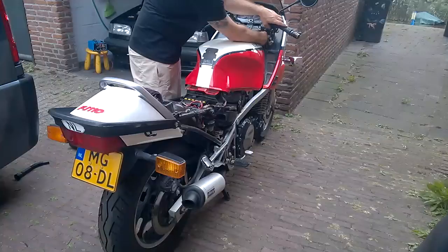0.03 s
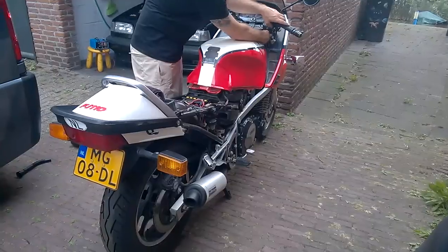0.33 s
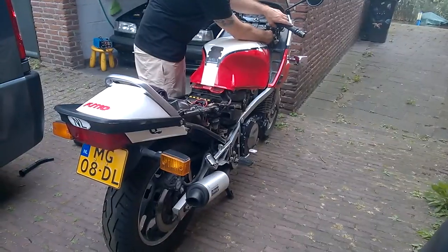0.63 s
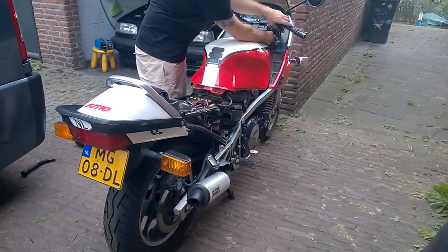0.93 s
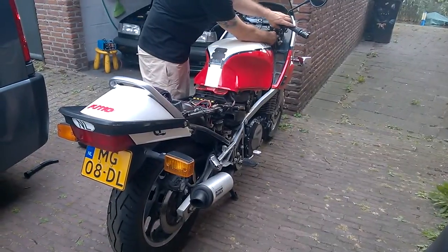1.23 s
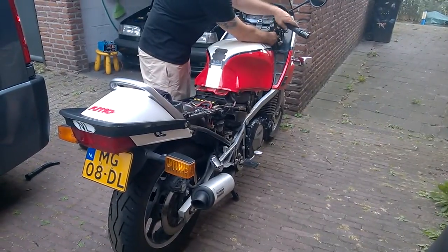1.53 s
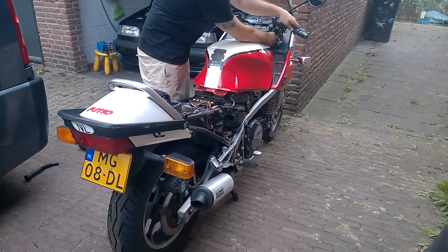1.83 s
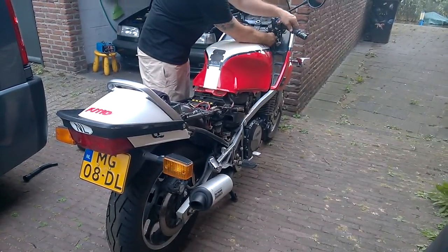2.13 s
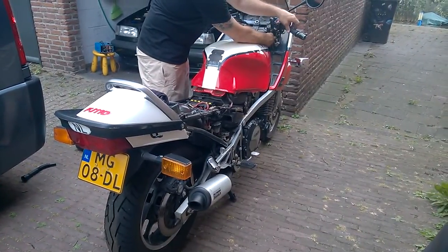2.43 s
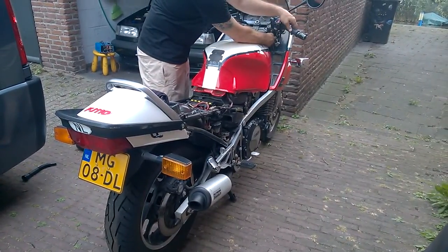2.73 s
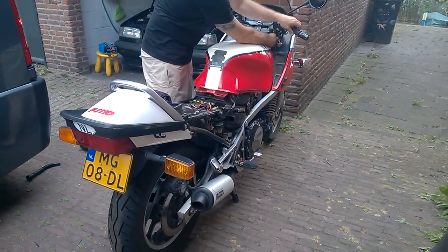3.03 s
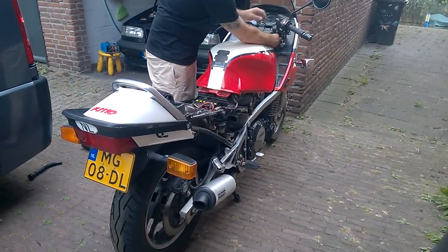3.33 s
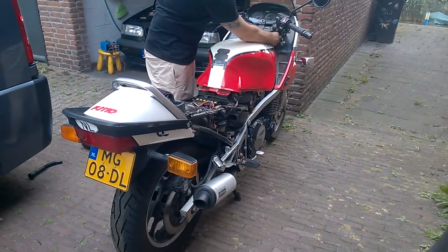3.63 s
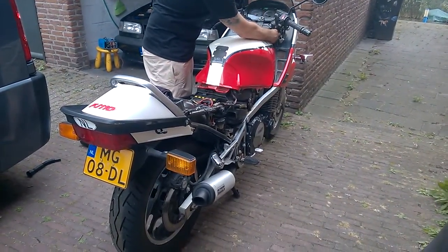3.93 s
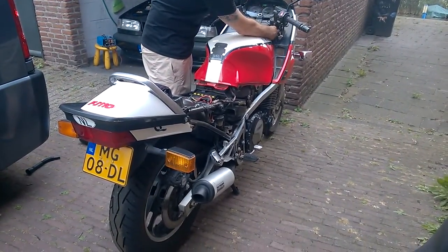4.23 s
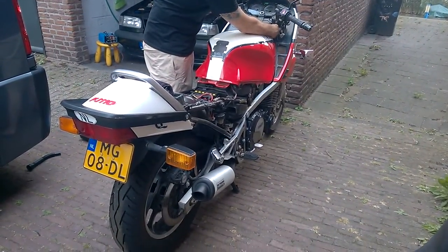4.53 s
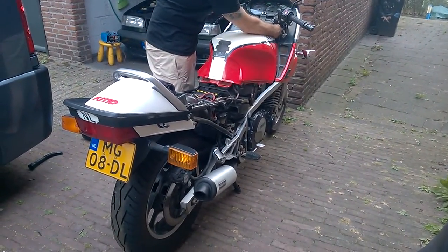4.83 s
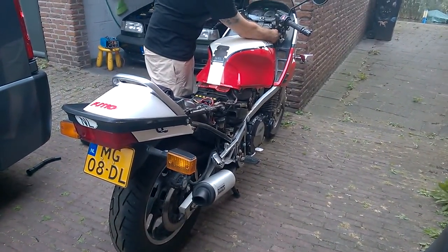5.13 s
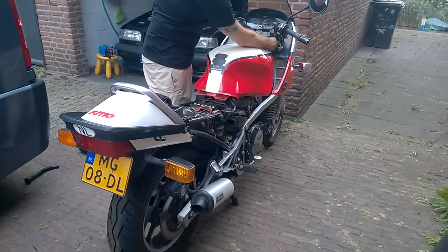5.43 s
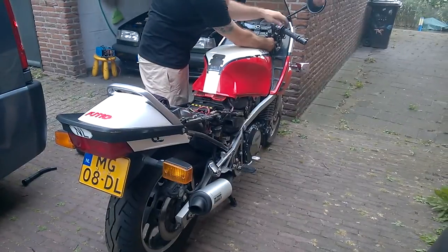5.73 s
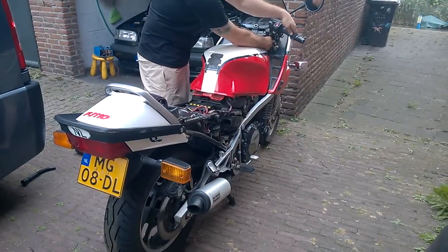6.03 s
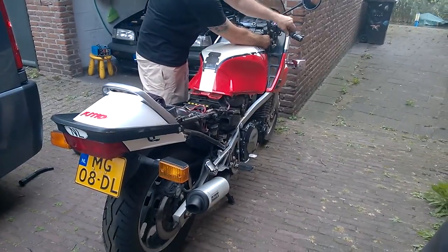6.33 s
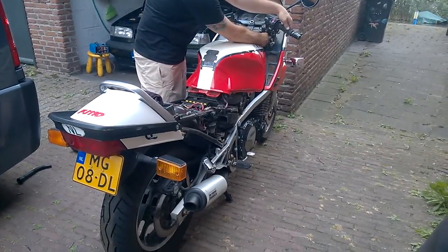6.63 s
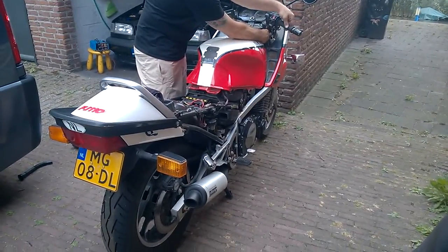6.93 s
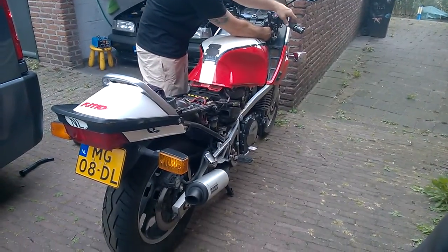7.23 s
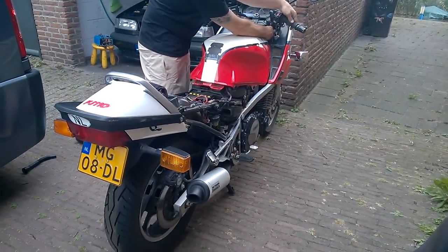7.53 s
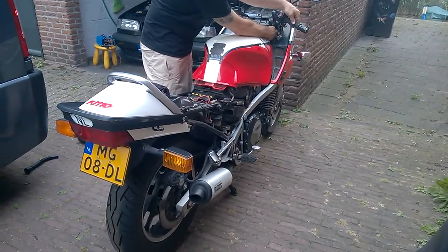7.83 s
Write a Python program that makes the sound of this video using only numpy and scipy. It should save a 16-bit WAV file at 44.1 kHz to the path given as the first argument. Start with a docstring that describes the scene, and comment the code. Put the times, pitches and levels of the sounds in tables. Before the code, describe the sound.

A motorcycle's starter snaps on and whirs briefly, the exhaust coughs and the engine catches. It climbs to a lumpy, booming idle with raspy exhaust, a mechanical rattle, a thin whine and light ticking. One quick rev comes early, then a dry click, then three more revs near the end, with sharp cracks from the pipe. The sound is close, from behind the silencer, outdoors on a quiet driveway.

```python
"""A four-cylinder motorcycle starts up, heard from close behind its silencer.
In faint street air a hand scuffs the handlebar; a relay snaps, the starter whirs and cold gas coughs.
The engine catches and climbs to a lumpy idle with one weak cylinder: firings boom and rasp through the
pipe, the valve gear rattles, a gear whines and a loose tappet ticks. Four throttle blips follow, with
barks in the pipe and one dry click between the first two. A fast limiter holds the peaks throughout."""
import sys
import numpy as np
from scipy import signal
from scipy.fft import rfft, irfft, next_fast_len
from scipy.io import wavfile
from scipy.ndimage import uniform_filter1d, minimum_filter1d, map_coordinates

SR = 44100
rng = np.random.default_rng(int(sys.argv[2]) if len(sys.argv) > 2 else 0)


def generate_wav(sig):
    """Save sig (samples, or channels by samples) to the path in sys.argv[1] as 16-bit PCM at SR."""
    pcm = np.round(np.clip(np.atleast_2d(sig).T, -1, 1) * 32767).astype(np.int16)
    wavfile.write(sys.argv[1], SR, pcm)


N = 351918
TIME = np.arange(N) / SR
CATCH_S, CLICK_S = .823, 5.4233  # steady firing begins; the dry click


def amp(db):
    """Decibels to gain."""
    return 10 ** (np.asarray(db) / 20)


def unit(x):
    """x at rms 1."""
    return x / np.sqrt(np.mean(x ** 2) + 1e-20)


def curves(rows):
    """One automation curve for each column after the time."""
    time_s, *columns = np.transpose(rows)
    return [np.interp(TIME, time_s, column) for column in columns]


def wobble(rate):
    """A smooth random curve, rate knots a second."""
    return map_coordinates(rng.standard_normal(int(N * rate / SR) + 4), [TIME * rate])


def coloured(x, points, peaks=()):
    """Causal EQ: a curve of (freq_hz, gain_db) with resonances (centre_hz, width_hz, lift_db) on top."""
    size = 2 * next_fast_len(N // 2 + SR // 4)
    hz = np.fft.rfftfreq(size, 1 / SR)
    freq_hz, gain_db = np.transpose(points)
    db = np.interp(np.log(hz + 1), np.log(freq_hz), gain_db)
    for centre, width, lift in peaks:
        db = db + lift / (1 + (2 * (hz - centre) / width) ** 2)
    cepstrum = irfft(np.log(amp(db)))
    cepstrum[1:size // 2] *= 2  # minimum phase: the ring follows the hit
    cepstrum[size // 2 + 1:] = 0
    return irfft(rfft(x, size) * np.exp(rfft(cepstrum)))[:N]


def impulses(times, sizes):
    """A spike of the given size at each time."""
    return np.bincount(np.round(np.asarray(times) * SR).astype(int), sizes, N)[:N]


def dying(x, t60):
    """Each spike of x leaves a tail that falls 60 dB in t60 seconds."""
    return signal.lfilter([1], [1, -amp(-60 / (t60 * SR))], x)


def levelled(x, window_s):
    """x with its slow level ridden towards 1."""
    size = int(window_s * SR)
    power = np.abs(uniform_filter1d(uniform_filter1d(x ** 2, size), size))
    return x / np.sqrt(power + np.mean(x ** 2) / 20)


# tone of the quiet street: freq_hz, gain_db
AIR_EQ = [(15, -13), (25, -10.5), (68, -5), (187, -28), (475, -22), (631, -34), (1680, -40), (3050, -43),
          (12000, -47), (15600, -81), (22000, -120)]
def street_air():
    """A faint bed of outdoor air fades in."""
    air_db, = curves([(.05, -82), (.15, -73), (.24, -59.5), (.5, -58.5)])
    return amp(air_db) * unit(coloured(rng.standard_normal(N), AIR_EQ))


# soft rubs on the handlebar: centre_s, half_width_s, pitch_hz, level_db
HAND_SCUFFS = [(.21, 0.044, 574, -69), (.28, 0.067, 3220, -72), (.45, 0.027, 455, -57)]
def hand():
    """The rider's hand finds the starter button: brief swells of narrow-band friction noise."""
    sound = np.zeros(N)
    for centre_s, half_width_s, hz, db in HAND_SCUFFS:
        band = [(hz / 2, -20), (hz, 0), (hz * 2, -24), (hz * 10, -45)]
        rub = unit(coloured(rng.standard_normal(N), band))
        sound += amp(db) * np.exp(-((TIME - centre_s) / half_width_s) ** 2) * rub
    return sound


# whine of the starter's gear mesh: time_s, pitch_hz, level_db
STARTER_WHINE = [(.52, 399, -63), (.555, 495, -31), (.625, 607, -25), (.642, 800, -38), (.654, 880, -23),
                 (.67, 805, -27), (.717, 686, -16.5), (.748, 520, -27), (.8, 440, -35), (.88, 300, -70)]
# partials of that whine: pitch_ratio, gain_db
MESH_PARTIALS = [(1, -13.5), (2, 7.5), (2.3, -12), (2.998, -6), (4, -18)]
# tone of the grinding teeth: freq_hz, gain_db
GRIND_EQ = [(40, -18), (200, -19), (520, -14.5), (850, -2.5), (1500, -6), (2700, -7.5), (3300, -14),
            (4700, -22.5), (6300, -20.5), (7200, -17), (9000, -26.5), (12000, -33), (15500, -35)]
# steel ring of the starter drive: centre_hz, width_hz, lift_db
STARTER_PEAKS = [(1150, 350, 6), (2600, 350, 4), (7050, 500, 4)]
def starter():
    """The relay snaps, the motor spins up through grinding gears and runs down as the engine catches."""
    on_s, off_s, attack_s, release_s, grind_db = .519, .72, 0.036, 0.074, -22
    mesh_hz, whine_db = curves(STARTER_WHINE)
    angle = 2 * np.pi * np.cumsum(mesh_hz * (1 + .013 * wobble(250))) / SR
    whine = unit(sum(amp(db + 2.5 * wobble(120)) * np.sin(k * angle) for k, db in MESH_PARTIALS))
    grit = amp(2.6 * wobble(300)) * rng.standard_normal(N)
    grind = unit(coloured(grit, GRIND_EQ, STARTER_PEAKS))
    attack = 1 - np.exp(-np.maximum(TIME - on_s, 0) / attack_s)
    release = np.exp(-(np.maximum(TIME - off_s, 0) / release_s) ** 2)
    relay = dying(impulses([on_s], [amp(-26)]), t60=.06) * rng.standard_normal(N)
    spinning = (TIME > on_s) & (TIME < STARTER_WHINE[-1][0])
    return relay + spinning * amp(whine_db) * whine + amp(grind_db) * attack ** 1.5 * release * grind


# first thumps before the engine catches: start_s, relative_db
COLD_COUGHS = [(0.725, 2.5), (0.744, -3.5), (0.775, -8)]
def coughs():
    """The first charges thump the pipe, which rings lower while its gas is cold."""
    start_s, db = np.transpose(COLD_COUGHS)
    cold_pipe = [(12, -4), (45, 11.5), (90, 18.5), (140, -20), (400, -56), (1200, -70)]
    thumps = (TIME >= start_s[0]) * coloured(impulses(start_s, amp(db)), cold_pipe)
    return 0.56 * thumps / np.abs(thumps).max()


# engine speed with the throttle shut: time_s, firing_hz
IDLE_SPEED = [(.82, 30.4), (.9, 46.9), (1, 40.9), (1.2, 42.6), (1.66, 56.4), (2.2, 68.2), (3.3, 72.3),
              (4.4, 66.3), (5.6, 55.5), (6.25, 54), (8, 70.8)]
# twists of the throttle: open_s, shut_s, added_firing_hz, twist_s, opening_fraction
THROTTLE_BLIPS = [(2.205, 2.399, 56.4, .17, .85), (6.258, 6.5, 54.4, .04, .65),
                  (6.881, 7.201, 68.4, .17, 1), (7.866, 8.064, 34.9, .1, .8)]
def crank():
    """Firing rate, throttle and starving: each blip revs the engine, which gasps and coasts back down."""
    coast_s, snap_shut_s, starve_s = .438, 0.024, 0.049
    speed, = curves(IDLE_SPEED)
    throttle, starved = np.zeros(N), np.zeros(N)
    for open_s, shut_s, added_hz, twist_s, opening in THROTTLE_BLIPS:
        rise = np.sin(np.pi / 2 * np.clip((TIME - open_s) / (shut_s - open_s), 0, 1)) ** 2
        since_shut = np.maximum(TIME - shut_s, 0)
        speed += added_hz * rise * np.exp(-since_shut / coast_s)
        twist = np.clip((TIME - open_s) / twist_s, 0, 1)
        throttle += opening * twist * np.exp(-since_shut / snap_shut_s)
        starved += opening * np.exp(-((TIME - shut_s) / starve_s) ** 2)
    return speed, throttle, starved


def pulling(speed):
    """1 while the engine gathers speed, 0 while it coasts down."""
    knee_hz_per_s = 4.1
    change = uniform_filter1d(np.gradient(speed) * SR, size=SR // 10)
    return (1 + np.tanh(change / knee_hz_per_s)) / 2


def cylinders(times):
    """Which of the four cylinders fires each time; the beat skips half a cycle at the click."""
    return (np.arange(len(times)) + 2 * (times > CLICK_S)) % 4


# tone of the rushing gas: freq_hz, gain_db
RASP_EQ = [(90, -30.5), (200, 12), (280, 0.5), (420, 6.5), (530, -0.5), (700, -0.5), (950, -3),
           (1300, -2.5), (1700, -1.5), (2100, -5.5), (2700, -1.5), (3500, -22), (4700, -30), (14000, -34.5)]
# midrange ring of the silencer: centre_hz, width_hz, lift_db
SILENCER_PEAKS = [(808, 96, 5), (996, 200, 9.5), (1224, 77, 4), (1417, 21, 6), (1707, 30, 3.5)]
# slow level rides as the cold engine settles: time_s, rasp_db, rattle_db
WARM_UP = [(.86, 2.5, 10), (.93, 2, 3.5), (1.1, -0.5, 4), (1.2, 1.5, 7.5), (1.7, 1, 5), (2.6, 0, 0.5),
           (3.15, 1, -1), (4.4, .5, 0), (5.3, -1.5, -0.5), (6.2, -1.5, 0), (6.7, -2, -2), (7.33, 1.5, 2),
           (7.6, -2, -2), (7.98, 0, -1.5)]
def rasp(times, throttle, octaves, starved):
    """Gas rushes out after each firing, louder with speed and in harder puffs under throttle."""
    idle_db, db_per_octave, open_db, starve_db = -33.5, 5.5, -24.5, -0.5
    leaky = np.where(cylinders(times) == 1, 2.2, 1)  # one cylinder blows harder
    sizes = leaky * amp(3 * rng.standard_normal(len(times)))
    puffs = unit(dying(impulses(times, sizes), t60=.04))
    flow = 1 + (0.38 + 1.5 * throttle) * puffs
    gas = coloured(flow * rng.standard_normal(N), RASP_EQ, SILENCER_PEAKS)
    catch_db = 7.5 * np.exp(-((TIME - CATCH_S) / 0.044) ** 2)  # the first firings blow harder
    drift_db, _ = curves(WARM_UP)
    level = np.hypot(amp(idle_db + db_per_octave * octaves + catch_db + drift_db), throttle * amp(open_db))
    return level * amp(starve_db * starved) * levelled(gas, window_s=0.045)


# bright tone of the chain and valve gear: freq_hz, gain_db
RATTLE_EQ = [(500, -9), (1500, 8), (2700, 7), (3700, 6), (4600, -2), (6300, 0), (7300, -3), (8500, -8.5),
             (11000, -11), (14500, -12), (16000, -22)]
# ring of the engine cases: centre_hz, width_hz, lift_db
CASE_PEAKS = [(2630, 80, 4.5), (2760, 24, 10), (4170, 50, 4), (6230, 130, 4), (6590, 55, 6), (6990, 40, 6),
              (7300, 45, 6), (8050, 80, 4), (8420, 30, 5)]
def rattle(phase, throttle, octaves, starved):
    """Cam chain and valve gear knock once a firing and ring the cases, louder with speed and throttle."""
    idle_db, db_per_octave, open_db, starve_db = -42.5, 4.5, -38, -5
    times = np.interp(np.arange(.7, phase[-1]), phase, TIME)
    sizes = amp(4 * rng.standard_normal(len(times)))
    knocks = unit(dying(impulses(times, sizes), t60=.05))
    clatter = (1 + 0.41 * knocks) * rng.standard_normal(N)
    _, drift_db = curves(WARM_UP)
    level = np.hypot(amp(idle_db + db_per_octave * octaves + drift_db), throttle * amp(open_db))
    return level * amp(starve_db * starved) * unit(coloured(clatter, RATTLE_EQ, CASE_PEAKS))


def gear_whine(cycle, speed, pull):
    """The primary drive sings at its tooth rate, most when coasting, smeared by the uneven crank."""
    teeth_per_firing, coasting_db, pulling_db = 28.4, -41.5, -45
    band_hz, band_octaves = 2450, 0.59  # where the cases carry it best
    load = amp(-4 * np.cos(np.pi * (cycle + .25) / 2) + 2.5 * wobble(200))  # swells once a cycle
    sway = -1.7 * np.sin(np.pi * cycle / 2) + 1.3 * wobble(330)
    whine = unit(load * np.sin(2 * np.pi * teeth_per_firing * cycle + sway))
    carried = np.exp(-(np.log2(teeth_per_firing * speed / band_hz) / band_octaves) ** 2)
    return amp(coasting_db + (pulling_db - coasting_db) * pull) * carried * whine


# stumbles, where the nearest firing all but fails: time_s
MISFIRE_TIMES = [1.81, 1.94, 2.07, 2.52, 2.9, 5.02, 5.15, 5.29, 5.55, 5.69, 6.11, 6.2, 6.265, 6.46]
def firings(phase, pull):
    """Moment and strength of each firing: steadier under load, lumpy when cold or coasting."""
    weak_coasting, weak_pulling = 0.024, 0.76  # strength of the weak cylinder
    coasting_db, pulling_db, cold_db = 3, 1.3, 9  # random spread of the strengths
    times = np.interp(np.arange(phase[-1]), phase, TIME)
    load = np.interp(times, TIME, pull)
    cold = np.exp(-(times - CATCH_S) / 0.4)
    weak = weak_coasting + (weak_pulling - weak_coasting) * np.maximum(load, cold)
    scatter_db = coasting_db + (pulling_db - coasting_db) * load + cold_db * cold
    sizes = np.where(cylinders(times) == 3, weak, 1) * amp(scatter_db * rng.standard_normal(len(times)))
    failed = np.abs(times[:, None] - MISFIRE_TIMES).argmin(axis=0)
    sizes[failed] *= .12
    return times, sizes


# bass body of the pipe: freq_hz, gain_db
PIPE_EQ = [(12, -54.5), (28, -3.5), (41, 9.5), (70, 2), (100, 10.5), (118, 3), (135, -6), (160, -15.5),
           (240, -25), (268, -40.5), (350, -32.5), (440, -30.5), (480, -48.5), (1200, -69.5)]
# hollow notes of the silencer's chambers: centre_hz, width_hz, lift_db
CHAMBER_PEAKS = [(193.2, 22, 9), (311.4, 60, 17), (412.5, 20, 5)]
def boom(times, sizes, throttle, octaves, starved):
    """Each firing thumps the silencer; an open throttle steepens the pulse and brings out overtones."""
    idle_db, db_per_octave, open_lift_db, starve_db, suck_hz = -10, -2, 2.5, -4.5, 24
    pulses = impulses(times, sizes)
    suck_back = 2 * signal.lfilter(*signal.butter(1, suck_hz, fs=SR), pulses)  # follows each puff
    body = coloured(pulses - suck_back, PIPE_EQ, CHAMBER_PEAKS)
    edge = coloured(body, [(120, -23.5), (190, 10.5), (400, 9.5), (900, 10.5)])
    level = amp(idle_db + db_per_octave * octaves + open_lift_db * throttle + starve_db * starved)
    caught = TIME >= times[0]
    return caught * level * levelled(body + (0.058 + 0.91 * throttle) * edge, window_s=.14)


# level ride of the ticking: time_s, level_db
TAPPET_LEVEL = [(.8, -70), (1.9, -49.5), (2.4, -54), (3.1, -50), (4.5, -51), (5.4, -79), (6.2, -77),
                (6.6, -52.5), (7.98, -53)]
# steel ring of one tick: pitch_hz, gain_db, t60_s
TAPPET_MODES = [(4000, 5.5, 0.12), (4460, 4.5, 0.094), (4930, 4.5, 0.063), (5340, 6, 0.063),
                (5900, -18, 0.06)]
def tappet(phase):
    """One loose tappet ticks once every four firings: a short scrape and a steel ring."""
    ticks, t = np.zeros(N + SR), TIME[:SR // 8]
    attack = 1 - np.exp(-t / 0.0066)
    times = np.interp(np.arange(.6, phase[-1]), phase, TIME)
    for start_s in times[cylinders(times) == 3]:
        ring = np.zeros(len(t))
        for hz, db, t60 in TAPPET_MODES:
            decay = amp(db + rng.normal(0, 1.5) - 60 * t / t60)
            ring += decay * np.sin(2 * np.pi * (hz * t + rng.random()))
        scrape = 5.5 * amp(-60 * t / 0.1) * rng.standard_normal(len(t))
        ticks[round(start_s * SR):][:len(t)] += (ring + scrape) * attack
    level_db, = curves(TAPPET_LEVEL)
    presence = [(1500, -21), (3500, 5.5), (5500, 10), (8000, -26), (15000, -18)]
    return amp(level_db) * unit(coloured(ticks[:N], presence))


# sharp cracks in the pipe: start_s, relative_db
PIPE_BARKS = [(2.359, -8.5), (2.382, -15), (3.981, -19), (6.503, -11.5), (7.065, -8.5), (7.097, -11.5),
              (7.12, -9), (7.156, -4.5), (7.185, -9), (7.2, -9), (7.213, -8)]
def barks():
    """Late-burning charges crack in the pipe and ring the silencer."""
    start_s, db = np.transpose(PIPE_BARKS)
    crack = [(200, -12), (600, -9), (1000, 0), (1600, -7), (2500, -13), (5000, -26), (14000, -38)]
    gas = coloured(rng.standard_normal(N), crack, SILENCER_PEAKS)
    return 0.3 * unit(gas) * dying(impulses(start_s, amp(db)), t60=0.095)


def click():
    """One dry, sharp click: a spike with a very short tail."""
    return dying(impulses([CLICK_S], [amp(-8.0)]), t60=0.015)


def scene():
    """The mono mix: street, starter and the engine layers, which all follow one crankshaft."""
    idle_hz, lope_db = 60, 0.5  # nominal firing rate; depth of the swell at that rate
    speed, throttle, starved = crank()
    pull, octaves = pulling(speed), np.log2(speed / idle_hz)
    phase = np.cumsum(speed) / SR
    phase -= np.interp(CATCH_S, TIME, phase)  # counted in firings, from the catch
    times, sizes = firings(phase, pull)
    cycle = phase + 2 * (TIME > CLICK_S)  # place in the round of four firings
    lope = amp(lope_db * idle_hz / speed * np.sin(np.pi / 2 * cycle))  # one swell a round
    noises = lope * (rasp(times, throttle, octaves, starved) + rattle(phase, throttle, octaves, starved))
    fade_in = np.clip((TIME - .75) / 0.05, 0, 1)
    engine = fade_in * (noises + tappet(phase) + gear_whine(cycle, speed, pull))
    exhaust = coughs() + boom(times, sizes, throttle, octaves, starved)
    return (starter() + exhaust + engine + barks() + click() + street_air() + hand())[None]


def record(dry):
    """A fast limiter ducks the whole mix under each loud peak; a steep low-pass trims the very top."""
    ceiling, window, top_hz = .51, int(.012 * SR), 15750
    needed = ceiling / np.maximum(np.abs(dry), ceiling)
    gain = uniform_filter1d(minimum_filter1d(needed, window), window)
    size = next_fast_len(N + SR // 4)
    passband = np.fft.rfftfreq(size, 1 / SR) < top_hz
    return irfft(rfft(dry * gain, size) * passband, size)[:, :N]


dry = scene()
out = record(dry)
generate_wav(out)
```